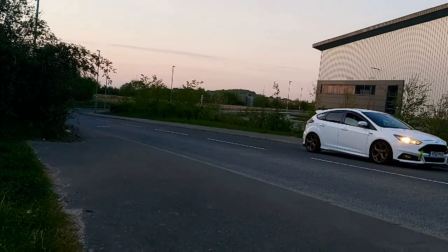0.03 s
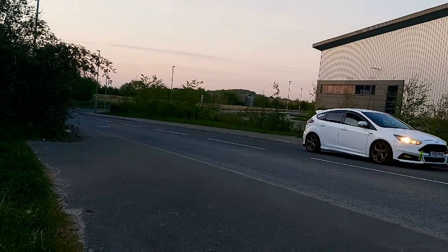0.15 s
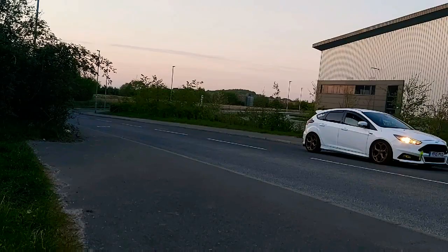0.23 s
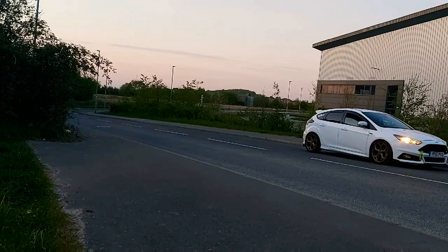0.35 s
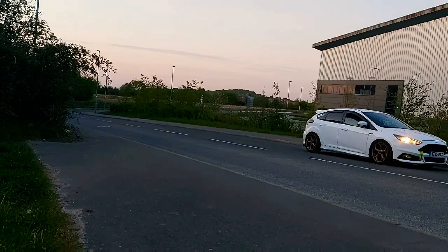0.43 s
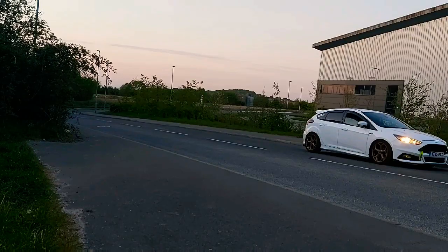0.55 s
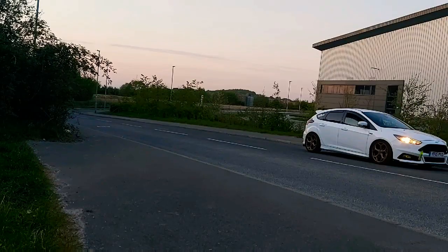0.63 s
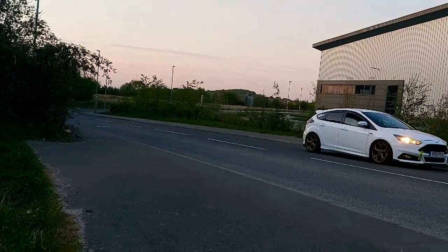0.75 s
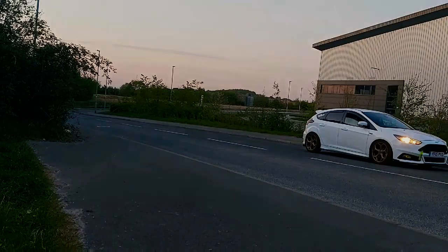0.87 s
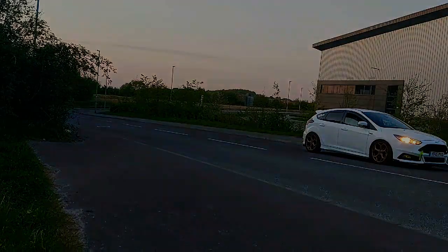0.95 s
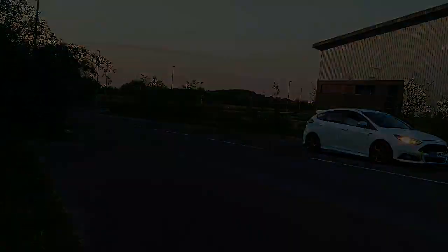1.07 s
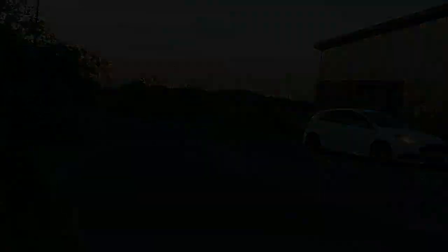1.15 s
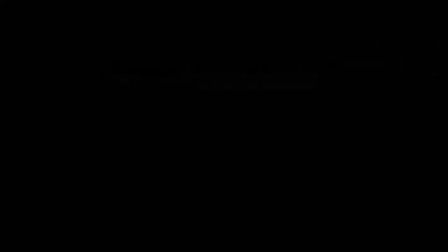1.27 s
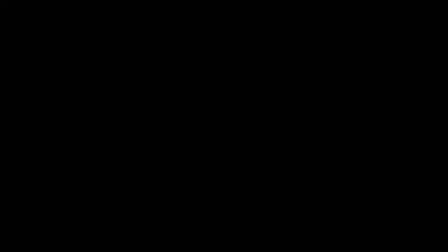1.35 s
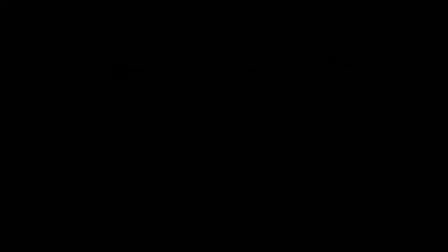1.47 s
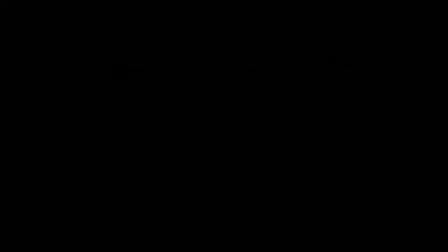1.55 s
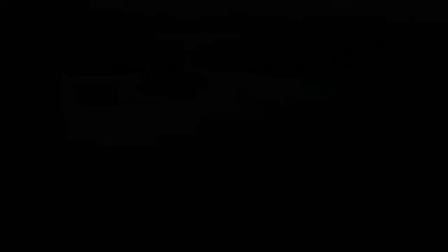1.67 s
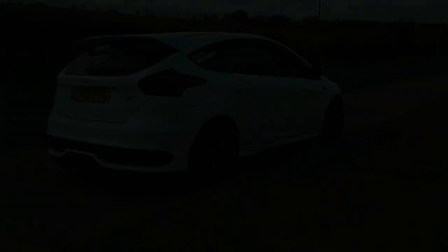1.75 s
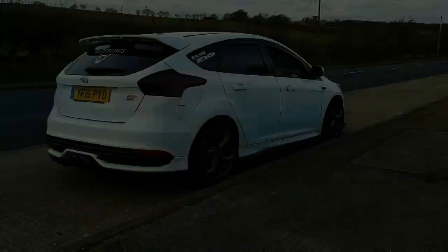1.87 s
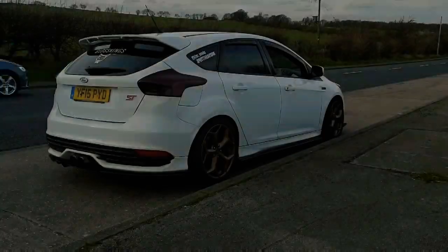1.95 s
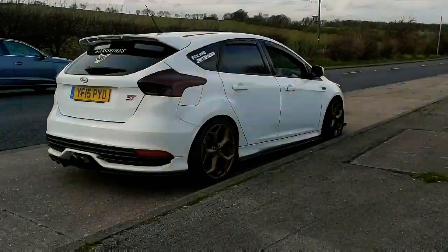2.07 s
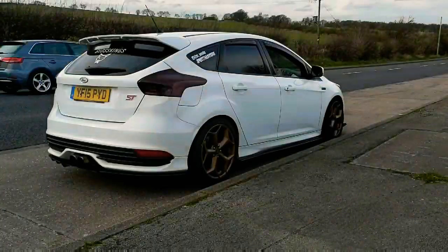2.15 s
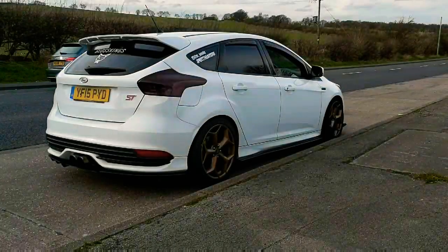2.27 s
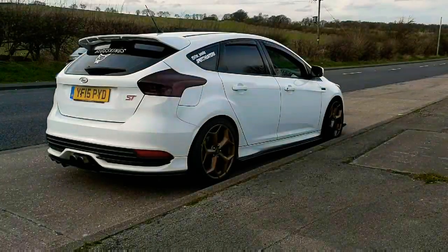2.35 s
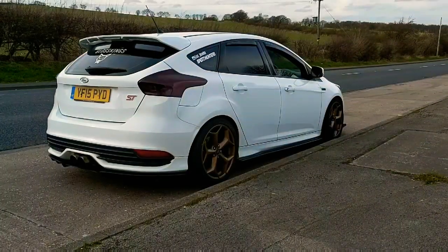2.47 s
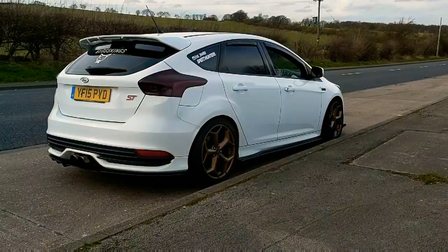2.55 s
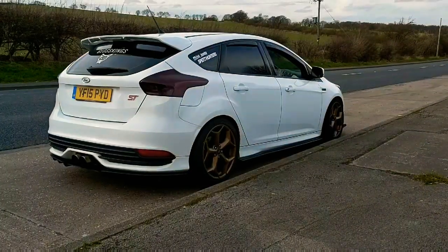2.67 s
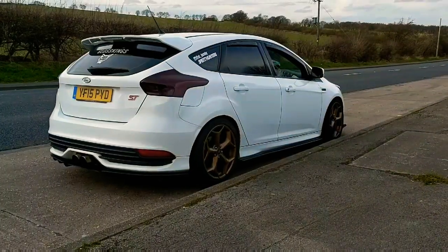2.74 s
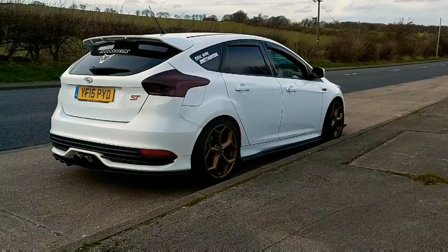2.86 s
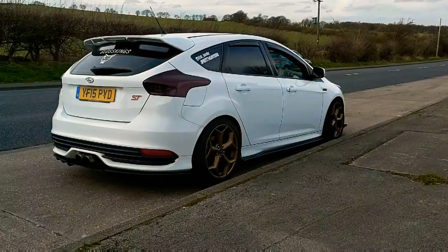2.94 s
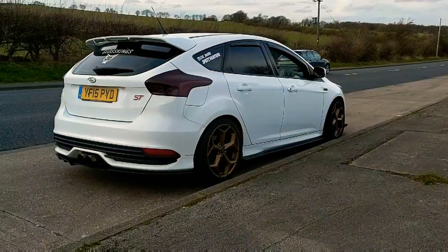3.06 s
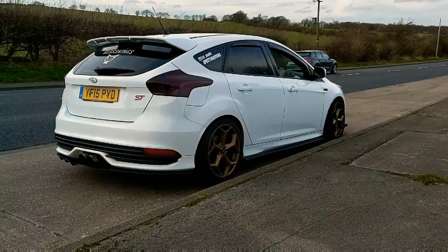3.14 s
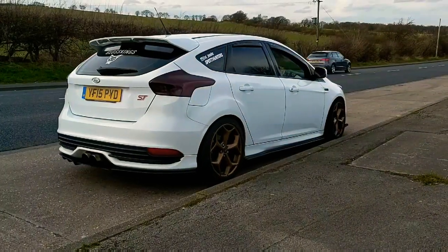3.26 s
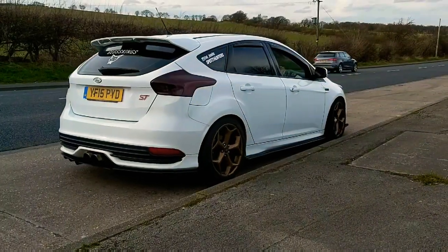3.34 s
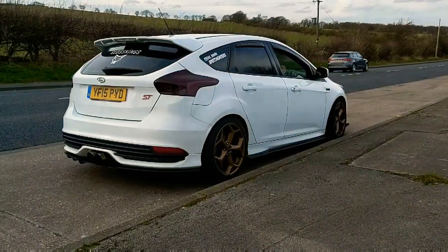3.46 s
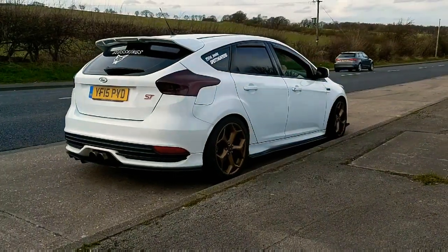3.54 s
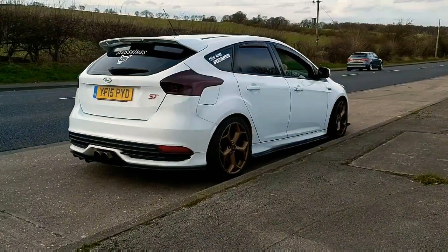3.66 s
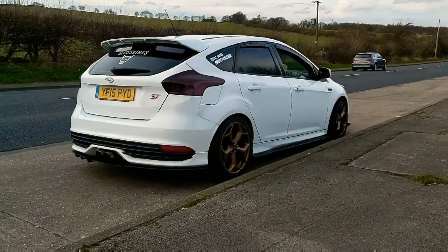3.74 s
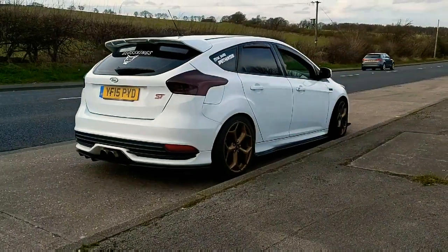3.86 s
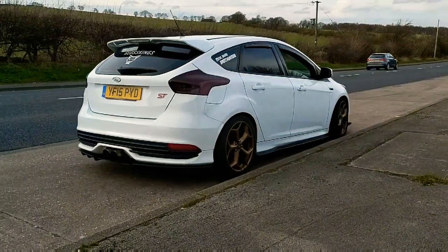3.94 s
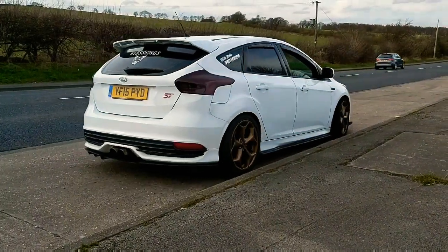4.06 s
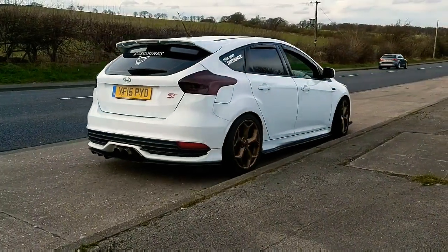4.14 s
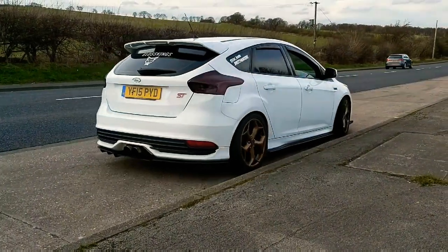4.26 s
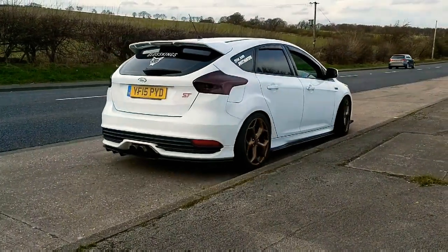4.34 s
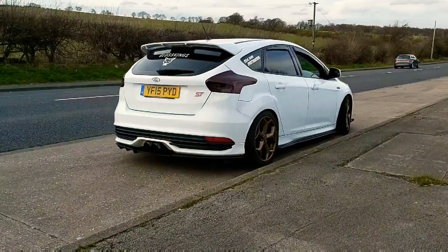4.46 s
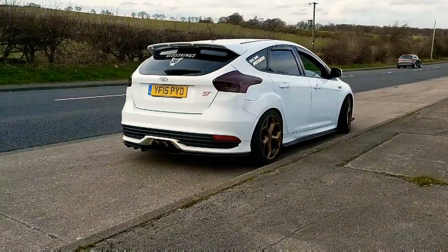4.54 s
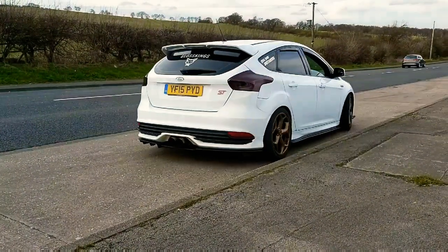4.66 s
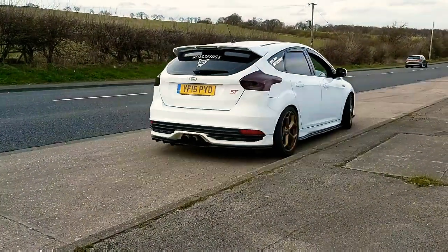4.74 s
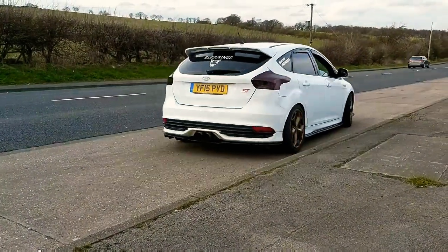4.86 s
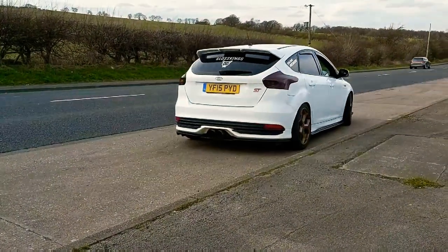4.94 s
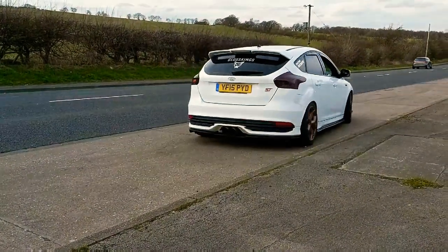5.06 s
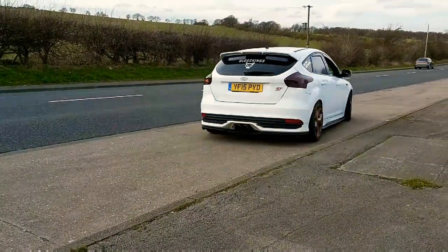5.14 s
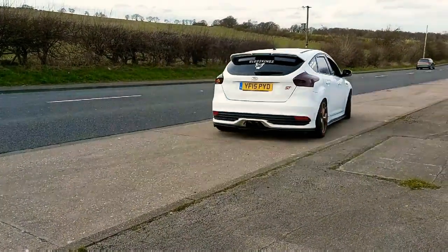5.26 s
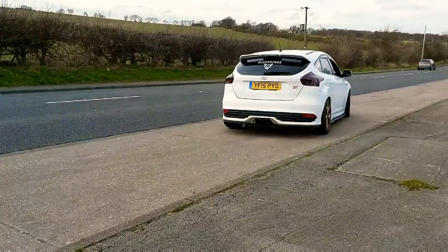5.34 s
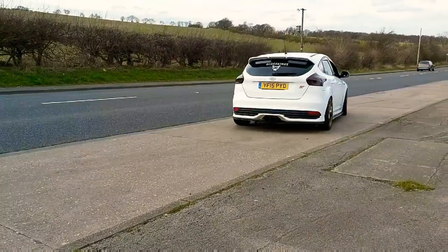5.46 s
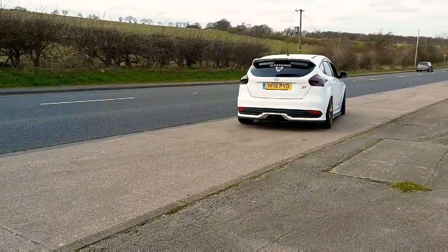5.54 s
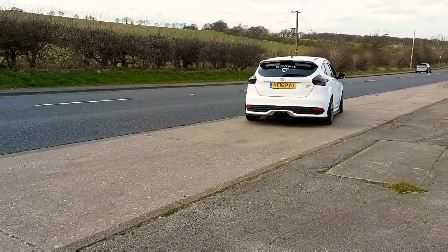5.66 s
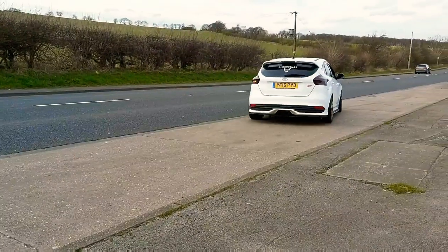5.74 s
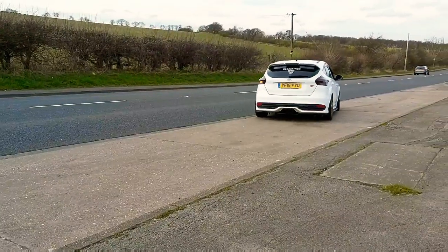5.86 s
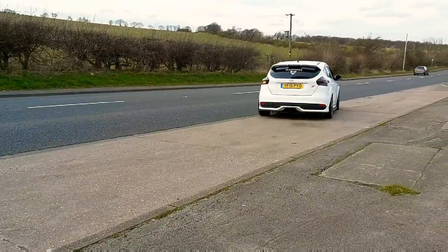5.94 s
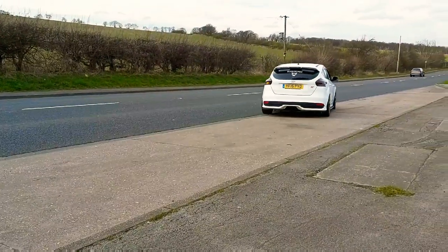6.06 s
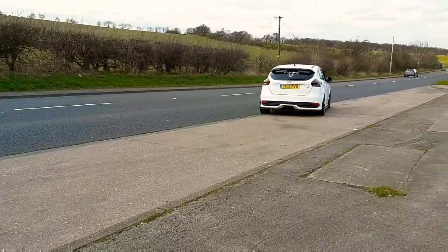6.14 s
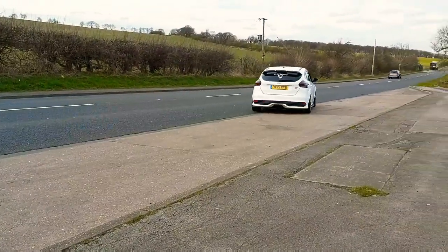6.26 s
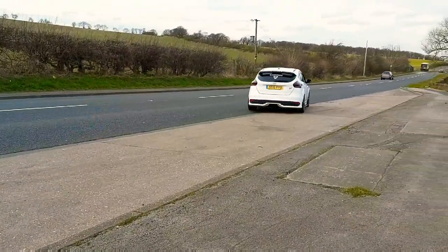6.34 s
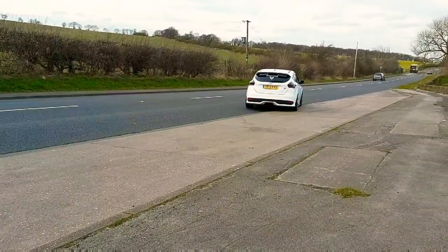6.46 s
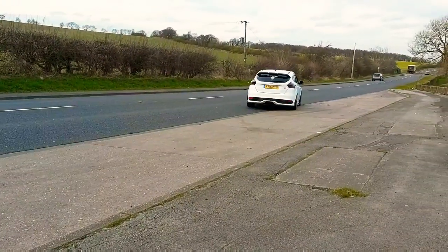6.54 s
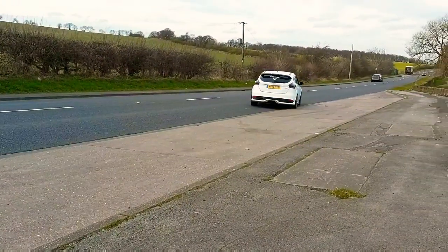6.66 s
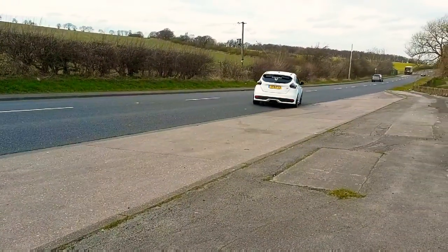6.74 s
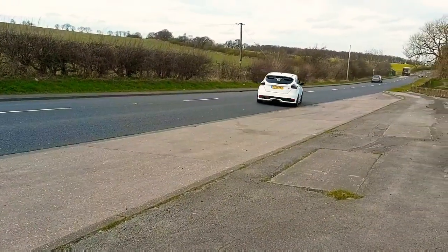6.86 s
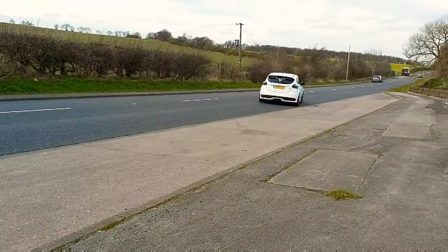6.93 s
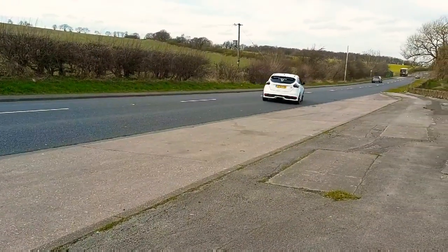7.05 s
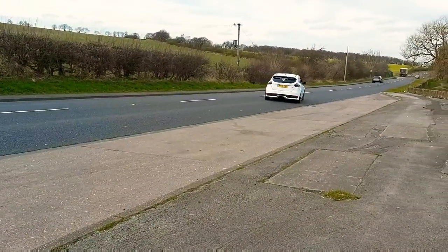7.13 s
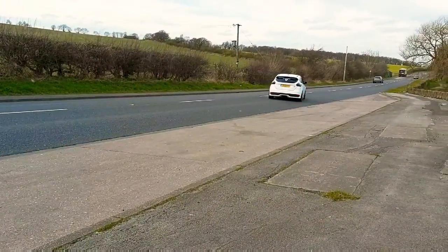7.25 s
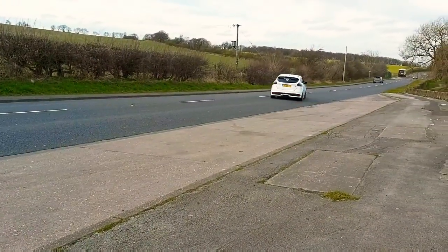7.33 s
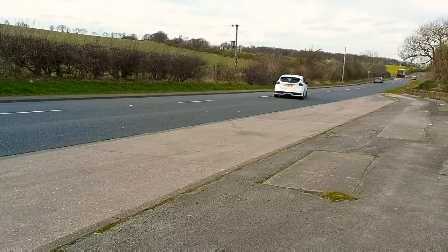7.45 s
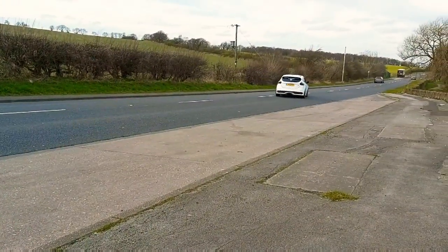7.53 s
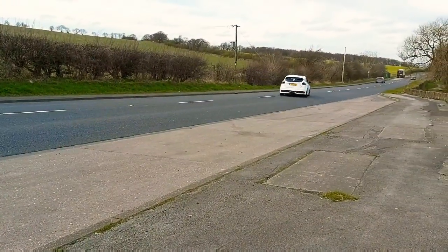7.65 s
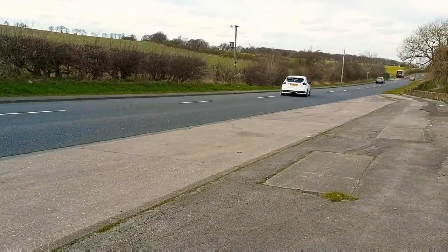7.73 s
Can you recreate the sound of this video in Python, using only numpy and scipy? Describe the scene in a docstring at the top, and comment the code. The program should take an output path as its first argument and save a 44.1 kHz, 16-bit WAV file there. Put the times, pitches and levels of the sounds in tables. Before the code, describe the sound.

A turbocharged car idles far off among birds, then close behind its exhaust it burbles, revs and accelerates hard.

```python
"""Turbo car: idle, revs and launch

A four-cylinder turbo car idles across a quiet road at dusk among birds and gusts; the sound fades out.
Then, close behind its tailpipes, it idles while another car's tyres roar away, is revved, slips the
clutch and pulls off hard. Each firing rings the exhaust pipe: boom and bark below, snarl and rasp above.
The loudest bass overloads, and rough resampling mirrors it into the treble."""
import sys
import numpy as np
from scipy import signal
from scipy.fft import rfft, irfft
from scipy.io import wavfile
from scipy.ndimage import uniform_filter1d, minimum_filter1d, map_coordinates

SR = 44100
rng = np.random.default_rng(int(sys.argv[2]) if len(sys.argv) > 2 else 0)


def bounce(signal):
    """Save signal as a 16-bit WAV file at the path given by the first command-line argument."""
    frames = np.transpose(np.atleast_2d(signal))
    limited = np.clip(frames, -1, 1)
    pcm = np.round(limited * 32767).astype(np.int16)
    wavfile.write(sys.argv[1], SR, pcm)


N = 343980

# exhaust pipe resonances at light and at full throttle: frequency_hz, gain_db
LIGHT_THROTTLE_PIPE = [(24, -52.5), (40, -10.5), (76, 4.5), (113, 11.5), (145, -2), (173, 10), (203, -5.5),
                       (231, -4.5), (293, 5.5), (378, 10.5), (472, -29), (520, -10.5), (600, -41),
                       (998, -60), (1800, -25.5), (2340, -73.5), (3960, -120)]
FULL_THROTTLE_PIPE = [(60, -66), (220, -38.5), (310, 6), (410, 4.5), (500, 0), (640, 6.5), (700, -8),
                      (860, 0.5), (930, -13), (1060, -0.5), (1330, -18.5), (1650, -20), (2200, -26.5),
                      (2400, -33), (3000, -47), (5000, -55.5)]
# rumble of wind on the microphone ports: frequency_hz, gain_db
WIND_SPECTRUM = [(20, -53), (60, 12.5), (150, 1), (350, -14), (700, -39), (2000, -54), (8000, -110)]


def near_engine():
    """Close exhaust: firings ring the pipe for bark and snarl; turbulent gas adds rumble and roar."""
    firing_rate = [(2.27, 32.9), (2.5, 33.2), (2.65, 31.1), (3.1, 31.9), (3.33, 35), (3.5, 39.2),
                   (3.75, 47.1), (3.93, 54.3), (4.02, 56.4), (4.13, 57.7), (4.3, 55.7), (4.42, 57.9),
                   (4.56, 62.5), (4.72, 63.9), (4.87, 62.6), (5.13, 56.3), (5.27, 50.8), (5.35, 52.6),
                   (5.41, 56.8), (5.55, 67.8), (5.7, 69.1), (5.87, 82), (6.06, 89.5), (6.12, 92.6),
                   (6.24, 101.3), (6.38, 106.9), (6.67, 123.1), (6.81, 136.3), (6.89, 134.7), (7.11, 150.7),
                   (7.31, 163.8), (7.57, 176.2), (7.8, 188.3)]  # engine speed: time_s, firings_per_s
    throttle_curve = [(5.4, 0.07), (5.9, 0.78)]  # time_s, opening (0-1)
    loudness = [(2.27, -15), (3.49, -14), (3.54, -4), (3.87, -4.5), (4.13, -0.5), (4.26, -4), (4.42, 3.5),
                (4.9, 0.5), (5.25, -4.5), (5.44, -3), (5.57, 4.5), (5.8, -1.5), (5.88, 2.5), (6.09, -0.5),
                (6.18, -4), (6.36, -1.5), (6.55, -2), (6.82, -1), (7.3, -0.5), (7.8, -0.5)]  # base level of the tailpipes: time_s, level_db
    snarl_curve = [(2.27, -52.5), (3.49, -36.5), (3.6, -31), (4.25, -34), (4.45, -25), (4.95, -29.5),
                   (5.25, -33), (5.46, -30), (5.6, -23), (5.84, -26), (6.09, -18.5), (6.18, -25.5),
                   (6.6, -23.5), (6.9, -20), (7.05, -16), (7.42, -16), (7.8, -13.5)]  # overtones above the bark: time_s, level_db
    burbles = [(2.315, 0.032, 10.5), (2.5, 0.015, 11), (2.676, 0.016, 7), (2.79, 0.034, 4.5),
               (2.95, 0.062, 6), (3.035, 0.072, 8), (3.112, 0.018, 3), (3.19, 0.0051, 10),
               (3.27, 0.038, 2.5), (3.43, 0.016, 10), (3.48, 0.0077, 10)]  # stronger firings at idle: centre_s, half_width_s, rise_db
    # bark against the base level, and strong-weak beat of the firings: firings_per_s, bark_db, beat_db
    tone_by_speed = [(33, -19.5, -18.5), (50.46, -7, -13), (64.1, -10.5, -4.5), (88, -10.5, -7.5),
                     (107.5, -15, -6), (137, -15.5, 2.5), (150, -19, 0.5), (189, -13, 8)]
    # uneven combustion, and stereo balance: time_s, scatter_db, jitter_cycles, left_over_right_db
    unevenness = [(2.27, 4, .03, -1), (3.48, 3, .03, -1), (3.6, 1.3, .01, -1), (5.4, 1.1, .008, -1.5),
                  (6.0, .5, .003, -1), (6.5, .3, .002, -1), (7.8, .25, .0015, -1)]
    # reflections off kerb and verge, left row then right: delay_s, gain_db
    roadside = [(.0043, -11), (.0069, -24.5)]
    per_s, = in_time(firing_rate)
    throttle, = in_time(throttle_curve)
    scatter_db, jitter, pan_db = in_time(unevenness)
    snarl_db, = in_time(snarl_curve)
    burble_db = swells(burbles)
    loud_db = in_time(loudness)[0] + burble_db
    speeds, bark_offsets_db, beats_db = np.transpose(tone_by_speed)
    bark_db = loud_db + np.interp(per_s, speeds, bark_offsets_db)
    fast_flow = np.interp(per_s, [90, 150], [0, 1])  # fast gas flow steepens the pulses

    clicks, alternating, phase = firings(per_s, scatter_db, jitter)
    boom = exhaust_boom(per_s, phase, loud_db, fast_flow)
    # the boom carries the four lowest orders, so take them out of the pulses
    upper = clicks - per_s / SR * (1 + sum(2 * np.cos(order * phase) for order in (1, 2, 3, 4)))
    pipe = pipe_ring(upper, alternating, throttle, np.interp(per_s, speeds, beats_db))
    bark = from_db(bark_db) * evened(band(band(band(pipe, 63, 520), 42, 688), 45, 590), 0.21)

    turbulence = stereo_noise(LIGHT_THROTTLE_PIPE, alike=1.0)
    grit = (1.8 - 1.4 * throttle) * turbulence[0]  # roughest at light throttle
    overtones = band(band(pipe + grit, 540, 2500), 560, 6000)
    snarl = from_db(snarl_db + burble_db) * evened(scattered(overtones, .0012, apart=.5), .1)
    rumble = from_db(bark_db - 19 - 4 * throttle) * turbulence

    puffs = 0.084 + 40 * band(clicks, 10, 170).clip(0)  # a surge of gas per firing
    rasp = tailpipe_rasp(clicks + .6 * alternating, puffs, per_s, snarl_db, fast_flow)
    roar_gain = throttle * from_db(loud_db - 30 + 2 * drift(15)) * (1 + puffs)
    roar = roar_gain * stereo_noise(FULL_THROTTLE_PIPE, alike=.85)
    exhaust = echoed(boom + bark, roadside) + snarl + rasp + rumble + roar
    return exhaust * from_db([pan_db / 2, -pan_db / 2])


def exhaust_boom(per_s, phase, loud_db, fast_flow):
    """The four lowest firing orders boom as wavering sines, sweeping through the pipe's resonances."""
    bass_response = [(30, -45), (50, -32.5), (64, -26.5), (82, -14.5), (110, -16), (137, -14), (150, -15),
                     (172, -14.5), (190, -23.5), (205, -34), (225, -19), (250, -18.5), (275, -12.5),
                     (330, -13), (380, -16), (470, -16), (560, -19.5), (640, -16), (700, -34), (760, -36)]  # the pipe's low end: frequency_hz, gain_db
    # orders 1-4 and their phase lead over the pulse: trim_db, slow_lead_rad, fast_lead_rad
    orders = [(1.5, 0.2, -1.9), (1.5, 1.6, -0.5), (1.5, 0.2, -4.4), (-1, -5.7, -3.9)]
    pipe_hz, pipe_db = np.transpose(bass_response)
    tilt_db = np.interp(per_s, [36, 42], [-7, 0])  # per order: higher ones are weaker at idle
    boom = np.zeros(N)
    for order, (trim_db, slow_lead, fast_lead) in enumerate(orders, 1):
        resonance_db = np.interp(np.log(order * per_s), np.log(pipe_hz), pipe_db)
        level_db = loud_db + resonance_db + trim_db + tilt_db * (order - 2) + 1.2 * drift(7)
        lead = slow_lead + (fast_lead - slow_lead) * fast_flow
        boom += np.sqrt(2) * from_db(level_db) * np.cos(order * phase + lead)
    return boom


def pipe_ring(pulses, alternating, throttle, beat_db):
    """Pulses ring the pipe, brighter on open throttle; unequal manifold branches add a strong-weak beat."""
    manifold = [(40, -18.5), (90, -14.5), (130, -12), (200, -14), (300, -1.5), (400, -1), (500, -0.5),
                (650, -3), (900, -11), (1500, -32), (4000, -54.5)]  # colour of the half orders: frequency_hz, gain_db
    light = evened(colour(pulses, LIGHT_THROTTLE_PIPE)[0], 0.27)
    full = evened(colour(pulses, FULL_THROTTLE_PIPE)[0], 0.27)
    beat = from_db(beat_db) * evened(colour(alternating, manifold)[0], .15)
    return -(1 - throttle) * light - throttle * full - beat


def tailpipe_rasp(pulses, puffs, per_s, snarl_db, fast_flow):
    """Gas jets from the tips in puffs of hiss; faster flow turns it into a brassy buzz of steep fronts."""
    jet_spectrum = [(710, -20.5), (1200, 3.5), (1320, -6), (2000, -16), (2360, -16.5), (2810, -19),
                    (4290, -25), (5580, -36.5), (14900, -43), (16200, -56)]  # gas jet at the tips: frequency_hz, gain_db
    bursts = [(3.65, 0.033, 11), (4.16, 0.014, 18), (4.43, 0.017, 5), (4.48, 0.023, 5), (5.99, 0.036, 5.5),
              (6.08, 0.024, 2.5), (6.845, 0.0098, 12), (7.06, 0.029, 4.5), (7.26, 0.034, 4.5),
              (7.39, 0.018, 5), (7.7, 0.071, 1)]  # flares of rasp under load: centre_s, half_width_s, rise_db
    trail_cycles, trail_db, crest_lag_s = 0.1644, -11.5, .0018
    level_db = -43 + 1.84 * (snarl_db + 25.5)  # grows faster than the snarl
    level_db += swells(bursts) + 1.6 * drift(8.3)
    hiss = evened(band(stereo_noise(jet_spectrum, alike=0.42) * puffs, 1400, 18000), 0.071)
    fronts = colour(pulses, jet_spectrum)[0]
    # each front is trailed by a weaker one
    trailing = np.interp(np.arange(N) - trail_cycles * SR / per_s, np.arange(N), fronts)
    fronts = band(fronts + from_db(trail_db) * trailing, 1500, 18000)
    buzz = evened(scattered(fronts, .0006, apart=.9), .1)
    brass = .25 + .7 * fast_flow
    rasp = from_db(level_db) * (brass * buzz + np.sqrt(1 - brass ** 2) * hiss)
    return np.roll(rasp, int(crest_lag_s * SR), axis=1)  # fronts ride the crest of the pressure wave


def far_idle():
    """Idle across the road: the exhaust thumps and the engine bay ticks once per firing."""
    levels = [(0, -32, -62), (.5, -32, -62), (.75, -30.5, -62), (1.15, -32.5, -63), (1.5, -38, -68),
              (1.85, -44, -75), (2.24, -64, -90)]  # fader curves: time_s, exhaust_db, tick_db
    distant_pipe = [(22, -29), (48, -41), (75, -1), (100, 1.5), (125, -5.5), (150, -2.5), (185, -24.5),
                    (270, -30), (335, -13.5), (410, -63), (495, -24), (580, -38), (1000, -47), (2500, -63)]  # exhaust resonances from afar: frequency_hz, gain_db
    bay_modes = [(1720, 130, 0), (1120, 90, -2), (490, 30, -3)]  # engine bay resonances: centre_hz, width_hz, gain_db
    exhaust_db, tick_db = in_time(levels)
    clicks, _, phase = firings(per_s=np.full(N, 24.9), scatter_db=np.full(N, .6), jitter=np.full(N, .004))
    thump = evened(-colour(clicks, distant_pipe)[0], 0.6)
    puff = np.exp(3 * np.cos(phase - 2.2)) * rng.standard_normal(N)
    tick = sum(from_db(db) * band(puff, hz - width / 2, hz + width / 2) for hz, width, db in bay_modes)
    car = from_db(exhaust_db) * thump + from_db(tick_db + 7) * evened(tick, .3)
    return np.array([np.roll(car, 8), car])  # off to the right, so the left port hears it later


def passing_tyres():
    """Road roar of another car moving off on the left, which reaches the left port first."""
    levels = [(2.27, -22.5), (2.6, -24.5), (3.0, -26.5), (3.5, -24), (4.0, -26.5), (4.6, -33), (5.5, -33),
              (7.8, -31)]  # fader curve of the roar: time_s, level_db
    tyre_spectrum = [(120, -30), (200, -12), (341, -4.5), (449, -18.5), (661, -23), (1010, -12.5),
                     (1630, -27), (1960, -29), (3270, -43.5), (4910, -50), (9690, -56.5), (13000, -62),
                     (16200, -75.5)]  # tread on the road: frequency_hz, gain_db
    gain = from_db(in_time(levels)[0] + 1.7 * drift(5.0))
    left, right = gain * stereo_noise(tyre_spectrum, alike=0.25) * from_db([[.5], [-.5]])
    return np.array([left, np.roll(right, 10)])


def birds():
    """Far warbling whistles, two voices to a phrase, blurred by echoes off a building."""
    phrases = [(0.0, 0.11, 2520, 2420, -54.5, 83), (0.155, 0.29, 2770, 2980, -53.5, 200),
               (0.576, 0.35, 2524, 2624, -56, 120), (0.787, .08, 4630, 5100, -64, 15),
               (0.9, .16, 4720, 4800, -65, 120), (0.997, 0.081, 1920, 1946, -54, 8.1),
               (1.24, 0.183, 2216, 2380, -52.5, 170), (1.41, 0.11, 2700, 2670, -56, 61),
               (1.497, 0.26, 2650, 2770, -61, 260)]  # start_s, length_s, start_hz, end_hz, level_db, warble_hz
    song, t = np.zeros(N), np.arange(N) / SR
    for waver in (drift(59.8), drift(62.2)):
        for start_s, length_s, start_hz, end_hz, db, warble_hz in phrases:
            progress = np.clip((t - start_s) / length_s, 0, 1)
            pitch_hz = start_hz + (end_hz - start_hz) * progress + warble_hz * waver
            envelope = np.sqrt(np.sin(np.pi * progress) + 1e-9) * (progress > 0)
            song += from_db(db) * envelope * np.sin(2 * np.pi * np.cumsum(pitch_hz) / SR)
    echoes = rng.standard_normal((2, 6000)) * np.exp(-np.arange(6000) / 2000) * 0.035
    return 0.16 * song + signal.fftconvolve(song[None], echoes, axes=1)[:, :N]


def wind_buffets():
    """Wind knocks on the ports in short lumps of low noise, mostly on the right."""
    knocks = [(0.714, -15, -4), (0.756, -16, -6), (0.837, -14, -1.5), (1.083, -13.5, -3), (1.188, -21, -24),
              (1.243, -43, -9), (1.307, -23, -27), (1.481, -34, -2.0), (1.696, -24, -22),
              (1.738, -17.5, -15), (1.805, -24, -13), (1.853, -28, -27), (1.885, -23.5, -23),
              (1.971, -37, -21), (2.089, -33, -9)]  # start_s, level_db, left_over_right_db
    rise_s = 0.0072
    envelope, t = np.zeros((2, N)), np.arange(N) / SR
    for start_s, db, pan_db in knocks:
        age = np.clip((t - start_s) / rise_s, 0, 50)
        envelope += from_db([[db + pan_db / 2], [db - pan_db / 2]]) * age * np.exp(1 - age)
    return 0.33 * envelope * stereo_noise(WIND_SPECTRUM, alike=0.36)


def road_wind(elapsed_s):
    """Light wind on the ports behind the car, dying down."""
    return from_db(-27.5 - 3.1 * elapsed_s + 3 * drift(8)) * stereo_noise(WIND_SPECTRUM, alike=0.16)


def evening_air():
    """A bed of far hiss, with gusts that swell separately on each microphone port."""
    levels = [(0.0, -47, -39, -33.5), (0.85, -48, -39, -34.5), (1.45, -51, -49, -34),
              (1.65, -54.5, -49, -38.5), (1.88, -59.5, -67, -39), (2.07, -64, -56, -36.5),
              (2.25, -75, -67, -55)]  # fader curves: time_s, hiss_db, left_wind_db, right_wind_db
    hiss_spectrum = [(120, -21), (200, -7), (334, 8.5), (420, -4.5), (1100, -10), (1400, -16.5),
                     (1750, -12.5), (2200, -14.5), (5900, -23.5), (16000, -35)]  # distant ambience: frequency_hz, gain_db
    hiss_db, left_db, right_db = in_time(levels)
    wind = stereo_noise(WIND_SPECTRUM, alike=0.9)
    gusts = wind * from_db([left_db + 3 * drift(28), right_db + 3 * drift(7.8)])
    return from_db(hiss_db) * stereo_noise(hiss_spectrum, alike=0.21) + gusts


def firings(per_s, scatter_db, jitter):
    """One uneven click per firing (jitter in cycles); the same with alternating sign; the cycle phase."""
    cycles = np.cumsum(per_s) / SR
    count = np.arange(1, int(cycles[-1]) + 1)
    chance = rng.standard_normal((1200, 2))[:len(count)]
    at = np.interp(count, cycles, np.arange(N))
    i = at.astype(int)
    strength = from_db(scatter_db[i] * chance[:, 1])
    at = np.clip(at + jitter[i] * chance[:, 0] * SR / per_s[i], 0, N - 2)
    i = at.astype(int)
    # each click is shared between its two nearest samples
    clicks, alternating = (np.bincount(i, s * (1 - at + i), N) + np.bincount(i + 1, s * (at - i), N)
                           for s in (strength, strength * (-1.) ** count))
    return clicks, alternating, 2 * np.pi * cycles


def echoed(x, echoes):
    """Each port hears the sound plus a reflection of its own."""
    return np.array([x + from_db(db) * np.roll(x, int(delay_s * SR)) for delay_s, db in echoes])


def scattered(x, decay_s, apart):
    """Many small reflections smear a pulse without colouring it, partly differently for each port."""
    shared, left, right = rng.standard_normal((3, 2048)) * np.exp(-np.arange(2048) / (decay_s * SR))
    smear = rfft([shared + apart * left, shared + apart * right])
    return signal.fftconvolve(x[None], irfft(smear / np.abs(smear)), axes=1)[:, :N]


def stereo_noise(spectrum, alike):
    """Coloured noise of rms 1; alike is the share of power common to both channels."""
    shared, left, right = rng.standard_normal((3, N))
    noise = colour(np.sqrt(alike) * shared + np.sqrt(1 - alike) * np.array([left, right]), spectrum)
    return noise / noise.std()


def colour(x, spectrum):
    """Minimum-phase EQ with the given spectrum: it rings only after each pulse."""
    size = 8192
    hz, db = np.transpose(spectrum)
    bin_hz = np.arange(size // 2 + 1) * SR / size
    gain_db = np.interp(np.log(bin_hz + 1), np.log(np.maximum(hz, 1)), db)
    cepstrum = irfft(gain_db * np.log(10) / 20)
    cepstrum[1:size // 2] *= 2
    cepstrum[size // 2 + 1:] = 0
    response = irfft(np.exp(rfft(cepstrum)))
    return signal.fftconvolve(np.atleast_2d(x), response[None], axes=1)[:, :N]


def band(x, low_hz, high_hz):
    """Gentle band-pass."""
    return signal.sosfilt(signal.butter(2, [low_hz, high_hz], "band", fs=SR, output="sos"), x + 1e-18)


def evened(x, window_s):
    """Level out a signal by its running rms."""
    return x / np.sqrt(uniform_filter1d(x ** 2, int(window_s * SR), axis=-1, mode="reflect") + 1e-14)


def drift(rate_hz):
    """Smooth random wander with a spread of 1."""
    pole = np.exp(-2 * np.pi * rate_hz / SR)
    slow = signal.lfilter([1], [1, -2 * pole, pole * pole], rng.standard_normal(N + SR))[SR:]
    return slow / slow.std()


def swells(rows):
    """Bell-shaped rises of level, in dB."""
    t = np.arange(N) / SR
    return sum(db * np.exp(-.5 * ((t - centre_s) / half_width_s) ** 2) for centre_s, half_width_s, db in rows)


def in_time(rows):
    """Automation curves from breakpoints, one value per sample."""
    time_s, *columns = np.transpose(rows)
    return [np.interp(np.arange(N) / SR, time_s, column) for column in columns]


def from_db(db):
    """Decibels to gain."""
    return 10 ** (np.asarray(db) / 20)


def scene():
    """Across the road, a blink of silence, then close behind the tailpipes."""
    since_cut_s = np.arange(N) / SR - 2.272
    gap_s, fade_in_s = .022, .0095
    across = far_idle() + birds() + evening_air() + wind_buffets()
    behind = near_engine() + passing_tyres() + road_wind(since_cut_s)
    return across * (since_cut_s < -gap_s) + behind * np.clip(since_cut_s / fade_in_s, 0, 1)


def record(dry):
    """A fast limiter, then overload; sample-and-hold rate conversion mirrors loud bass into the treble."""
    ceiling, span = 1.244, int(0.013 * SR)  # the ceiling is above full scale, so peaks still clip
    capture_hz, cutoff_hz = 47989.8, 16300
    needed_gain = 1 / np.maximum(np.abs(dry).max(axis=0) / ceiling, 1)
    gain = uniform_filter1d(minimum_filter1d(needed_gain, span), span)
    clipped = np.clip(dry * gain, -1, 1)
    last_captured = np.floor(np.arange(N) * capture_hz / SR) * SR / capture_hz
    held = np.array([map_coordinates(side, [last_captured], order=1, mode="nearest") for side in clipped])
    return signal.sosfilt(signal.cheby2(12, 60, cutoff_hz, fs=SR, output="sos"), .994 * held)


dry = scene()
out = record(dry)
bounce(out)
```